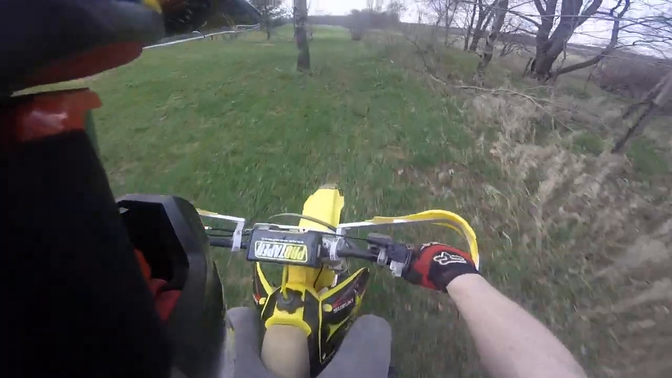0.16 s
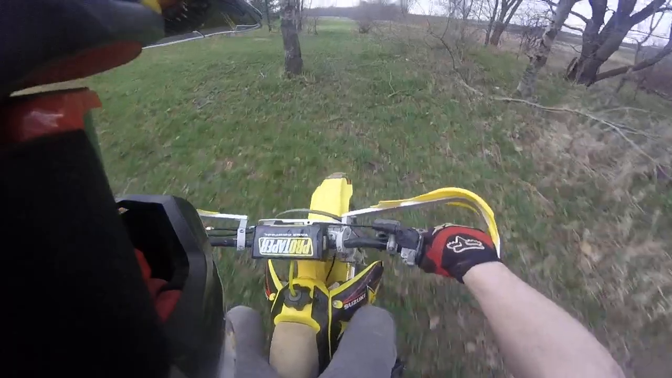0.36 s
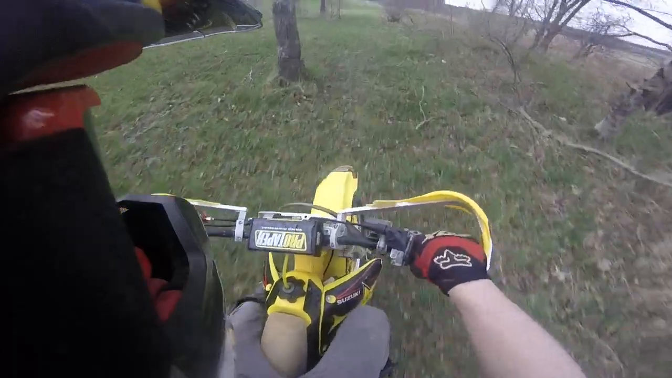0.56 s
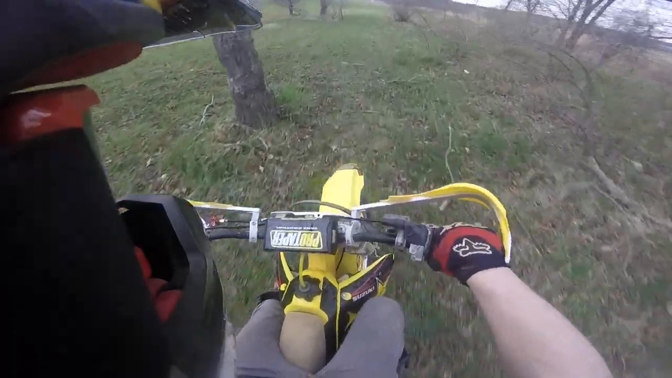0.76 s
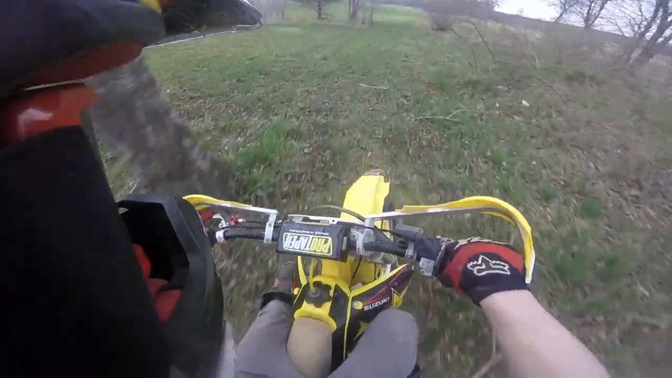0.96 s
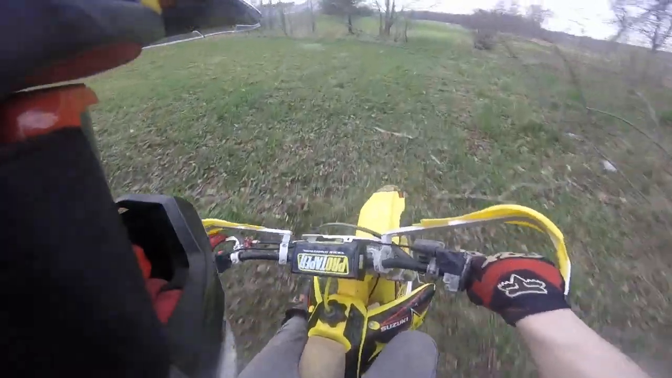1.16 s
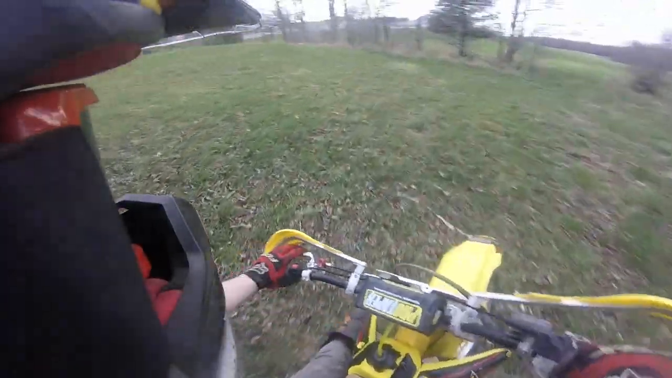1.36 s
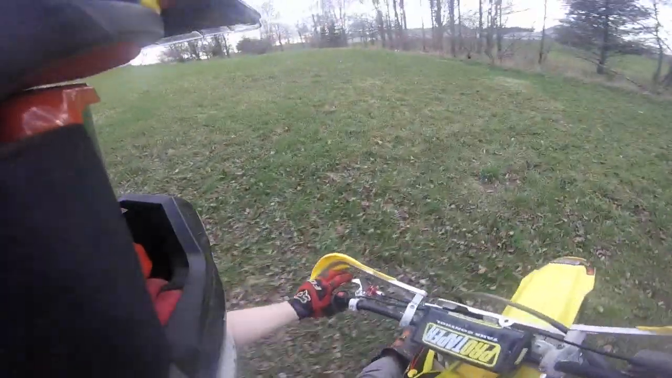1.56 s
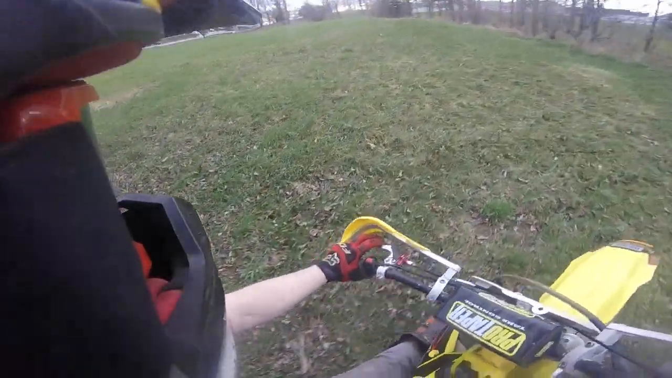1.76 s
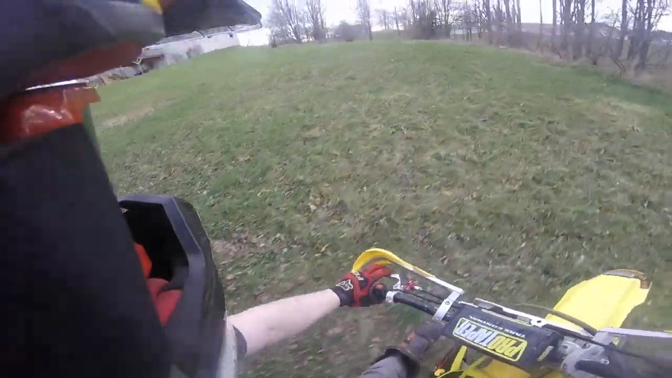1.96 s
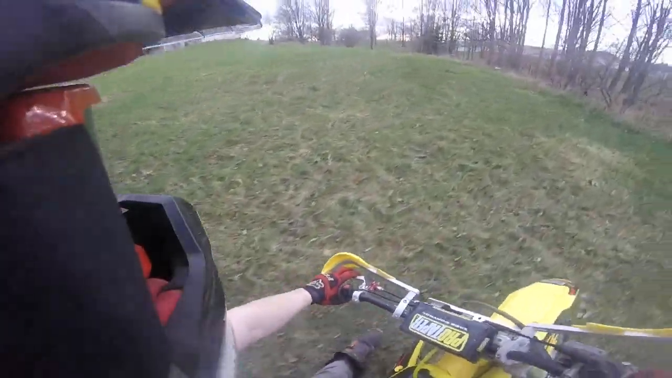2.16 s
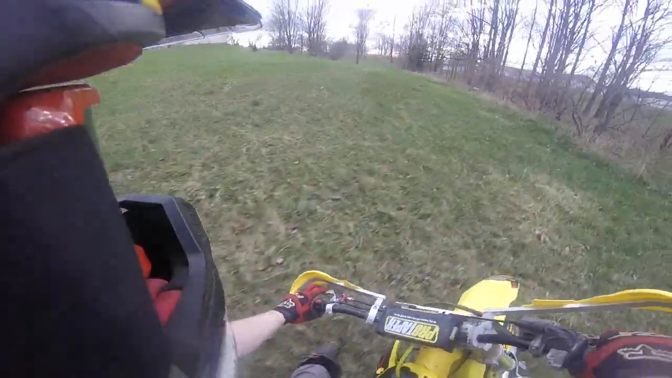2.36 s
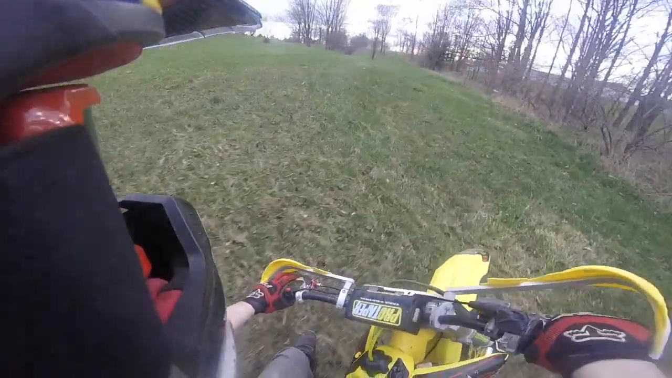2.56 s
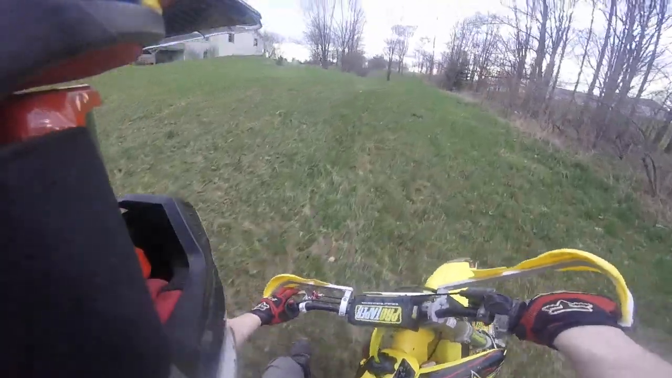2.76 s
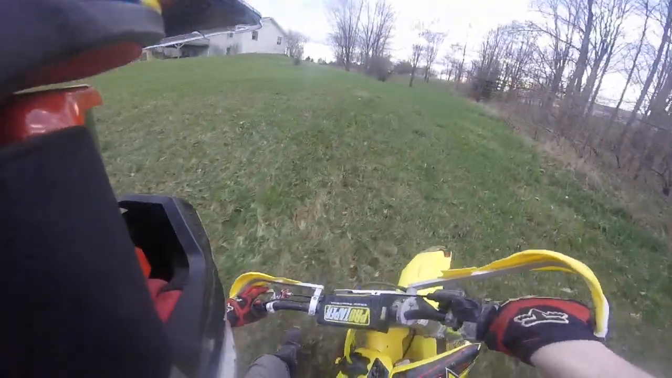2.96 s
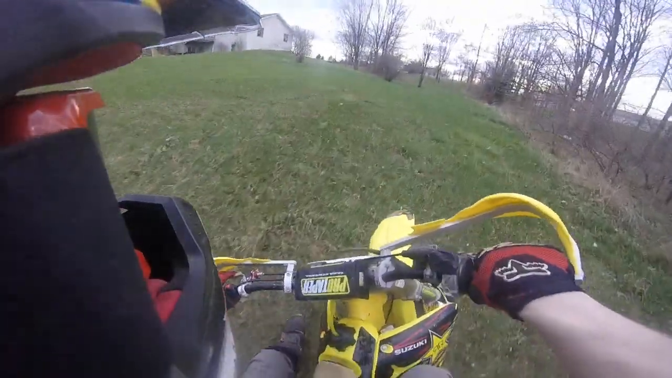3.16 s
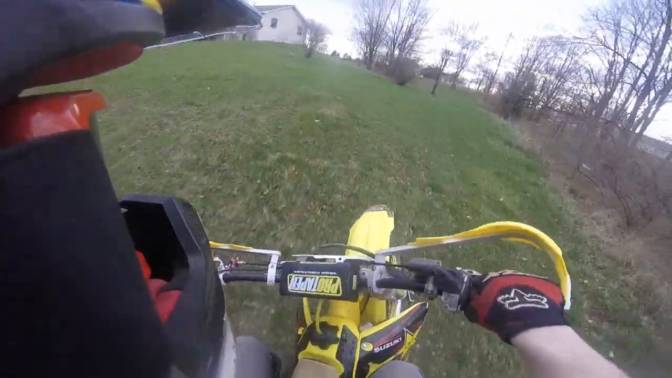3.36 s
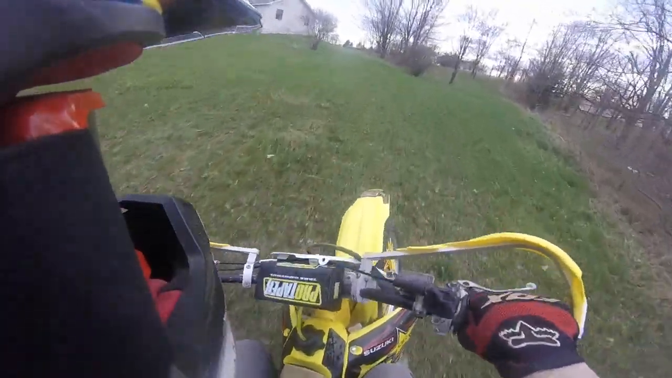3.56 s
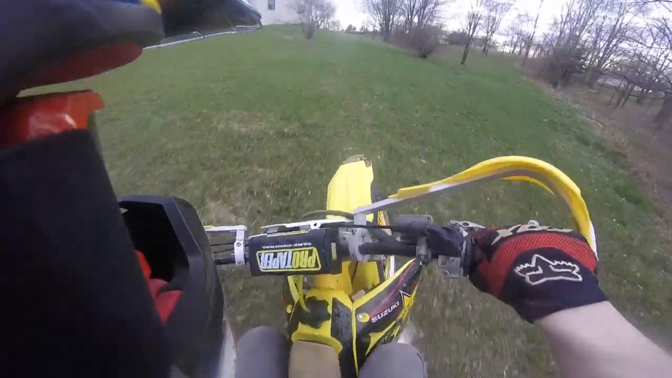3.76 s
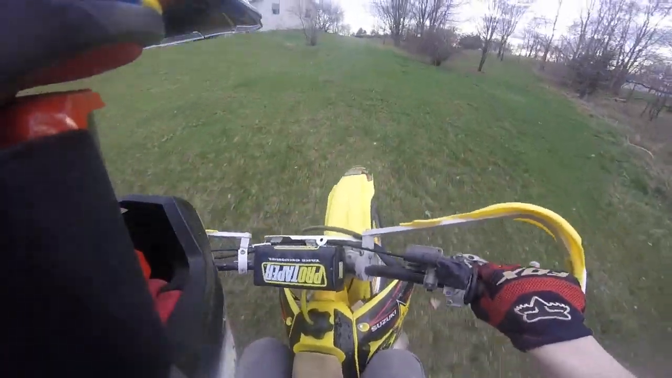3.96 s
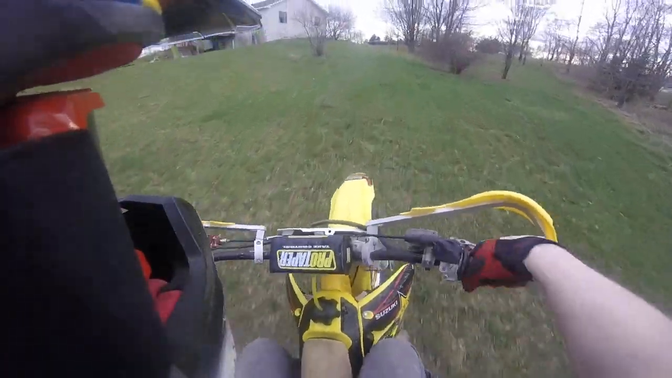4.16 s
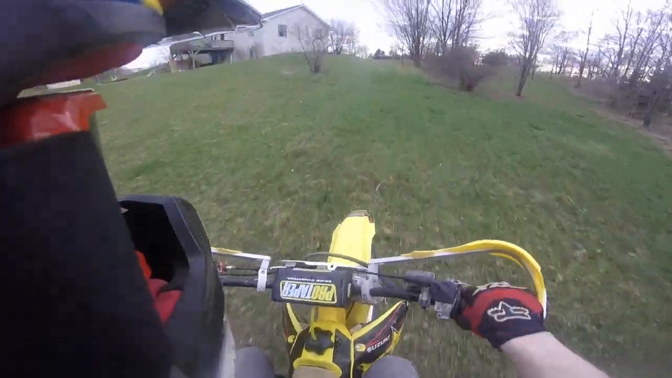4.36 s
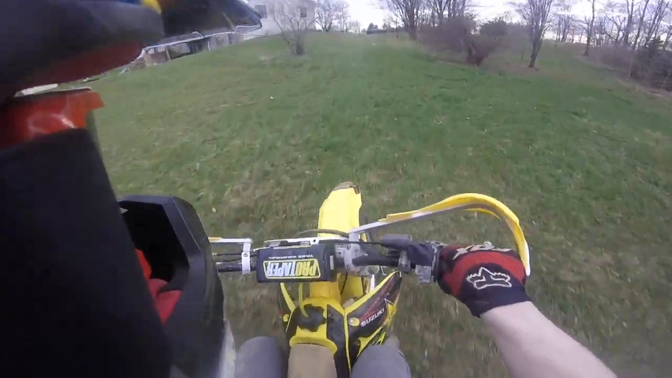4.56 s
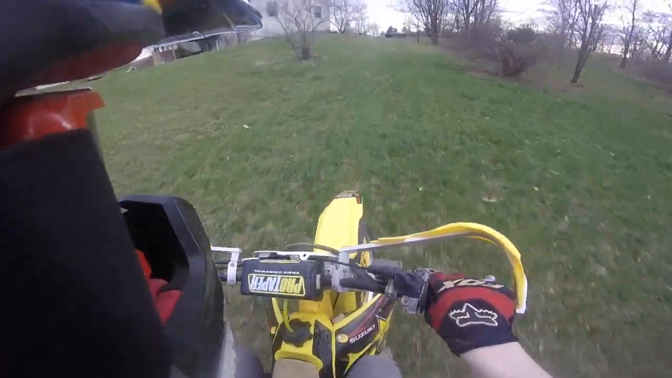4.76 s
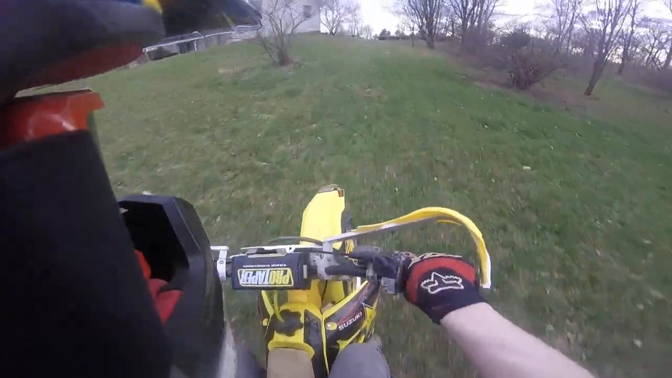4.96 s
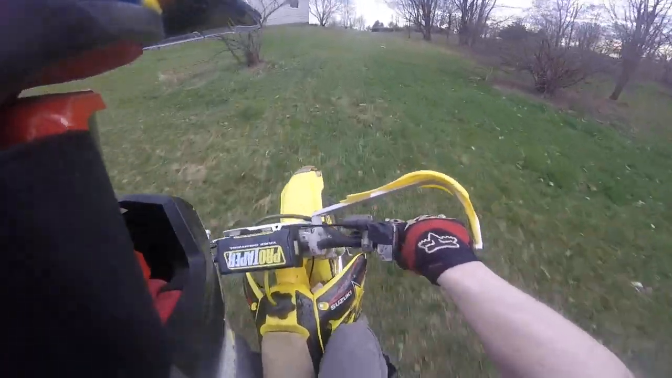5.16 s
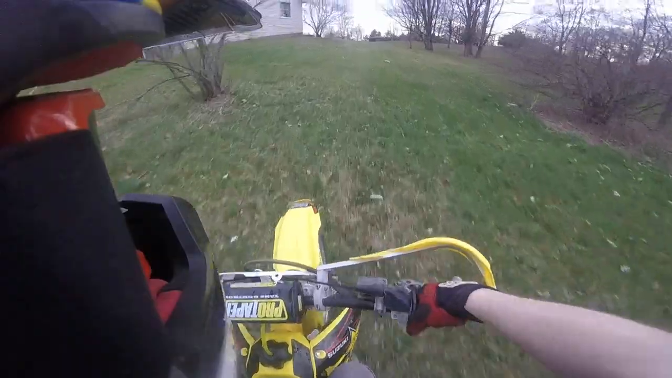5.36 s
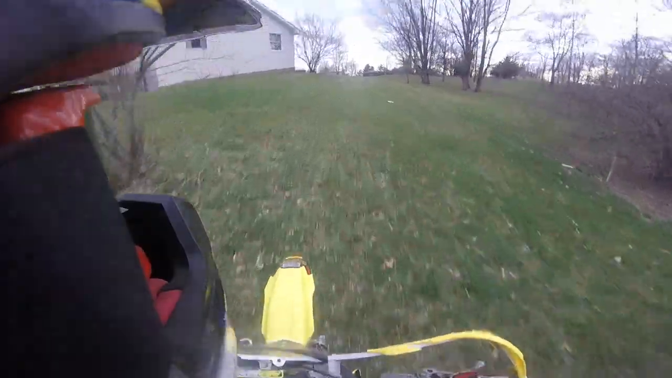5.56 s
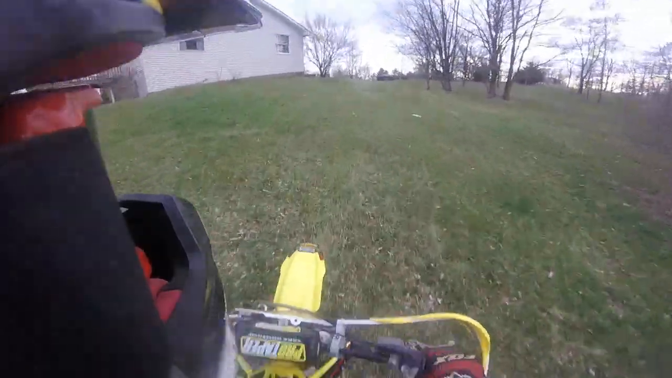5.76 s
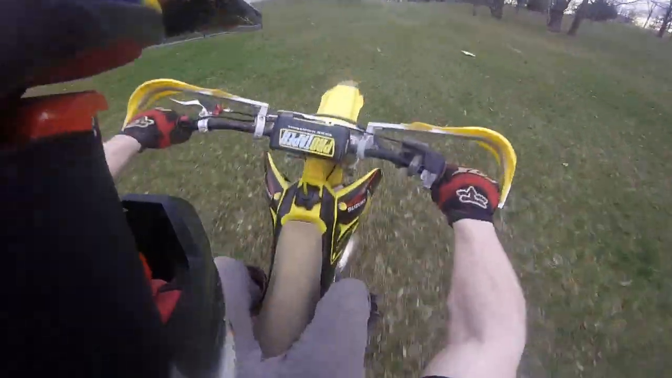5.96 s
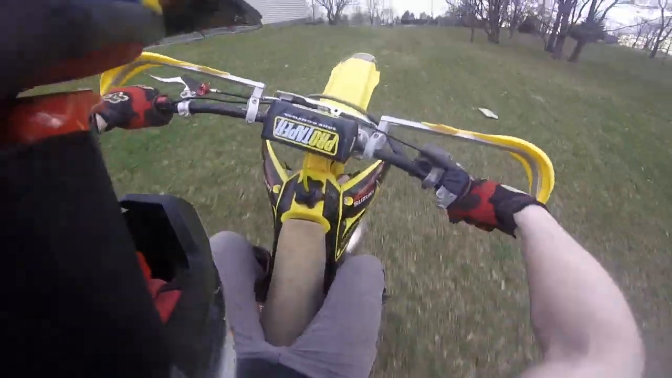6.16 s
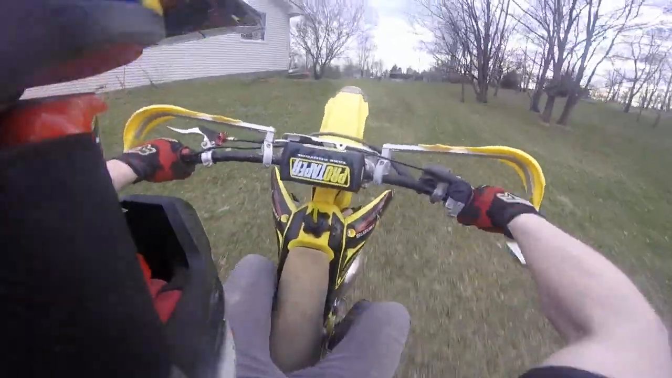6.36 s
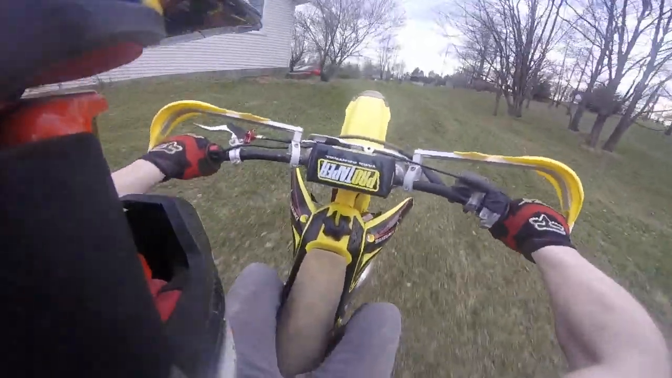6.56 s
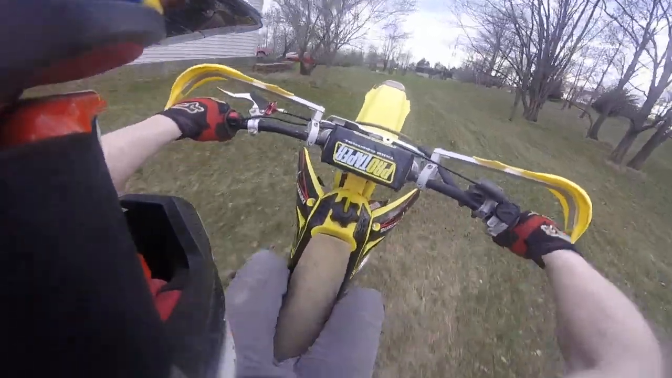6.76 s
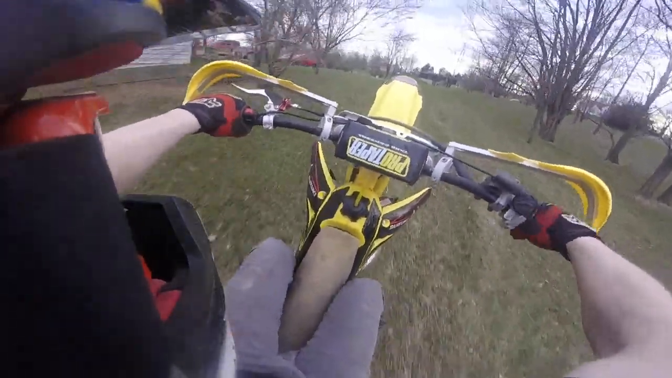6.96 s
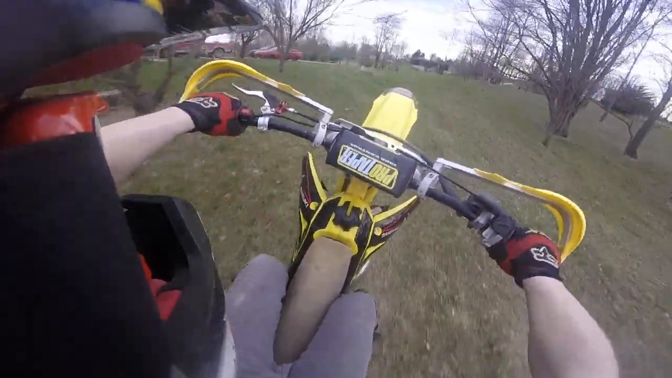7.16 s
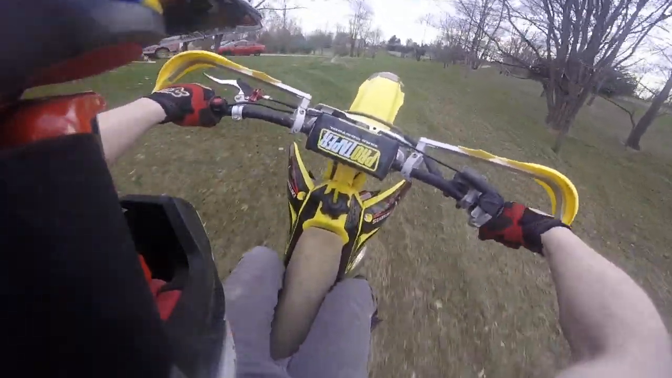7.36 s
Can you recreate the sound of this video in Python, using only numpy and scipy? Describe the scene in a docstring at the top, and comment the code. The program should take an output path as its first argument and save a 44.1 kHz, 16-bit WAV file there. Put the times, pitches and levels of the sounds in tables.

```python
"""A two-stroke dirt bike ridden over a field, heard at the rider's helmet.
A pull on the throttle ends and the bike coasts down with stray pops; it picks up, pulls through the revs
twice and is then blipped three times. Each firing excites the silencer, airbox and steel expansion chamber
as resonators and adds a bright rasp; gears whine at tooth-mesh rate.
Shaped noise makes the wind buffeting and the rush of chain and tyres throughout."""
import sys
import numpy as np
from scipy import signal
from scipy.fft import rfft, irfft, next_fast_len
from scipy.io import wavfile
from scipy.ndimage import uniform_filter1d

SR = 44100
rng = np.random.default_rng(int(sys.argv[2]) if len(sys.argv) > 2 else 0)


def put_to_file(sound):
    """Save the sound as 16-bit audio at rate SR, in the file named by the first command-line argument."""
    columns = np.atleast_2d(sound).T  # one column per channel
    safe = np.clip(columns, -1, 1)
    whole_steps = np.round(safe * 32767)
    wavfile.write(sys.argv[1], SR, whole_steps.astype(np.int16))


N = 326781
TIME = np.arange(N) / SR
PADDED = next_fast_len(N + SR // 2, real=True)
FREQ = np.maximum(np.fft.rfftfreq(PADDED, 1 / SR), 1)

# crank speed while the bike first coasts down, one firing a turn: time_s, crank_hz
COAST_REVS = [(0, 114.7), (.17, 117.3), (.36, 110.4), (.46, 113.2), (.72, 100.1), (1.2, 85.4), (1.7, 73.66),
              (1.88, 73.3)]
# crank speed from the pick-up on; it jumps when the rear wheel slips: time_s, crank_hz
REVS = [(1.96, 80.3), (2.14, 79.55), (2.22, 87.5), (2.28, 88.8), (2.58, 93.6), (2.67, 100.8), (2.81, 95.5),
        (2.98, 103.3), (3.1, 118.2), (3.29, 111.3), (3.48, 114.1), (3.6, 126.2), (3.64, 122.7),
        (3.8, 141.8), (3.87, 134.1), (3.99, 154.9), (4.04, 155.1), (4.21, 184.2), (4.28, 154.5),
        (4.34, 148.0), (4.45, 142.5), (4.48, 135.8), (4.54, 116.7), (4.66, 121.5), (4.71, 117.2),
        (4.84, 137.8), (4.99, 133.2), (5.06, 163.4), (5.07, 162.3), (5.1, 139.8), (5.12, 135.7),
        (5.16, 143), (5.22, 136.6), (5.33, 142.9), (5.36, 140.0), (5.42, 121.9), (5.63, 110.4),
        (5.81, 115.1), (5.89, 152.7), (5.97, 147.6), (6.03, 157.1), (6.1, 142.9), (6.15, 150), (6.25, 154),
        (6.41, 133.1), (6.51, 125.2), (6.56, 136.5), (6.6, 128), (6.85, 151.8), (6.91, 152.7),
        (6.98, 139.9), (7.07, 136.2), (7.1, 127.6), (7.12, 129.2), (7.24, 151), (7.3, 143.4), (7.35, 152.5),
        (7.41, 149.6)]
# the crank hunts a little around its speed: spread as a share, rate
HUNT, HUNT_RATE_HZ = 0.004025, 22

# pulls on the throttle, with levels when wide open (ring and rasp at the cruising crank speed):
# opens_s, shuts_s, attack_s, exhaust_note_db, chamber_ring_db, rasp_db
PULLS = [(-.3, 0.337, .02, -26.5, -22.5, -22.5), (1.676, 4.215, 0.19, -17, -16, -20),
         (4.432, 5.335, .015, -15, -17.5, -19.5), (5.816, 6.267, 0.057, -15.5, -17.5, -20),
         (6.5, 6.911, .02, -15.5, -19.5, -20), (7.106, 7.428, 0.0202, -17.5, -19.5, -19)]
# how far the grip is turned during the pulls: time_s, opening (0-1)
GRIP = [(.3, 0.15), (1.72, 0), (1.95, .16), (2.62, 0.38), (3.15, 0.33), (3.46, 0.56), (3.65, 0.57),
        (3.81, 1), (4.42, 0.94), (4.54, 0.56), (4.76, 0.61), (4.82, 0.9)]
# the note answers at once, surges on the first rich charges and fades as the grip rolls shut
NOTE_CLOSE_S, NOTE_CLOSED_SHARE, NOTE_RELEASE_S, SURGE_DB, SURGE_S = 0.095, 0.46, .02, 2, 0.16
# ring and rasp build once the pipe is hot and stop with the fire
HEAT_LAG_S, HEAT_RISE_S, HEAT_RELEASE_S = 0.021, 0.028, 0.013
# the hot pipe mutters on after a pull
MUTTER_DB, MUTTER_S = -24, 0.6
# coasting levels at the cruising crank speed
CRUISE_HZ = 140
COAST_NOTE_DB, COAST_RING_DB, COAST_RASP_DB = -50, -30.5, -30.5
# growth with crank speed in dB per octave, coasting and then under power
COAST_NOTE_SLOPE_DB, COAST_RING_SLOPE_DB, COAST_RASP_SLOPE_DB = 9, 15, 13
RING_SLOPE_DB, RASP_SLOPE_DB = 10.5, 8
# loss from a wide open to a shut grip
NOTE_RANGE_DB, RING_RANGE_DB, RASP_RANGE_DB = 14.5, 8.5, 9
# brief dips (positive) or flares (negative) of the chamber ring: middle_s, half_length_s, loss_db
RING_DIPS = [(2.1, .12, -1.5), (2.6, 0.3, 6), (5.165, .025, -4.5), (4.09, .022, 11), (4.215, 0.027, 6),
             (5.9, .04, 6), (6.055, 0.03, 11)]
# brief flares or sinks of the rasp: middle_s, half_length_s, change_db
RASP_FLARES = [(.55, 0.19, -4), (4.01, .04, 3), (4.5, 0.031, 1.5), (5.22, .13, 3), (5.865, 0.031, -5),
               (5.05, 0.025, 0), (6.14, .12, 3), (6.56, .03, 4.5), (6.89, 0.034, 3)]
# stumbles at light throttle: middle_s, half_length_s, extra_firing_spread_db
STUMBLES = [(1.8, 0.099, 4.5), (2.55, 0.047, 5.5)]
COAST_SPREAD_DB, POWER_SPREAD_DB = 1.7, .6

# silencer response at light and at full throttle: frequency_hz, relative_level_db
LIGHT_PIPE = [(60, -46), (100, -29.5), (160, 9.5), (205, 14.5), (320, 21.5), (400, -3.5), (440, -9),
              (495, 13.5), (600, -3), (690, 2), (940, -32), (1150, -25), (1400, -26), (2500, -54)]
FULL_PIPE = [(60, -16), (125, -6.5), (175, -2.5), (280, 12.5), (380, -1.5), (450, 4), (520, -5.5),
             (620, -2), (750, -16), (1130, -18.5), (2500, -41)]
# airbox response: frequency_hz, relative_level_db
AIRBOX = [(400, -20), (620, -7), (690, 8.5), (750, -19.5), (800, 6), (900, 4), (970, -3), (1060, 7.5),
          (1150, 9), (1260, 0), (1700, -32)]
# airbox honk relative to the exhaust note, fading below a crank speed
HONK_DB, HONK_FROM_HZ, HONK_FADE_DB_PER_HZ = -15, 100, 2
# swells of the honk: middle_s, half_length_s, rise_db
HONKS = [(3.25, 0.44, 8), (5.1, 0.3, 2.5), (6.08, 0.094, 9), (6.7, 0.097, 10.5), (7.29, 0.051, 10.5)]
# unburnt charge pumped through the pipe: frequency_hz, relative_level_db
PUMPING = [(50, -40.5), (90, 1), (120, 8), (145, 5), (190, 3.5), (240, -3), (340, -10), (430, 6),
           (600, -19), (680, 1.5), (850, -20.5), (1200, 4), (2000, -38)]
# modes of the expansion chamber shell: frequency_hz, width_hz, relative_level_db
CHAMBER = [(1102.6, 19.6, 1.5), (1405, 94, 8.5), (1538, 69, 8.5), (1604, 45, 11), (1700, 44, 8),
           (1768, 50, 4)]
# narrow rings of the engine's metal: frequency_hz, width_hz, level_above_rasp_db
FINS = [(2527, 27, 4), (2963, 57, 6), (3237, 42, 5), (3596, 24, 5.5), (3724, 21, 4), (3863, 88, 6),
        (4670, 12, 10), (4805, 52, 6), (5480, 114, 10), (5826, 33, 11), (6060, 50, 7), (6230, 39, 7.5),
        (7680, 74, 4.5), (8220, 86, 9), (8880, 20, 10), (9800, 80, 2.5)]
# rasp spectra, each: frequency_hz, relative_level_db
# exhaust bark under power
BARK = [(1500, -21), (2000, -13), (2300, 0), (2550, 1.5), (2720, -3.5), (3000, -3.5), (3600, 3),
        (3950, -6.5), (4250, -9), (4750, -13.5), (5150, -41), (7000, -31)]
# piston clatter
CLATTER = [(1500, -13.5), (2000, -7.5), (2500, -5.5), (3000, 0.5), (3300, 0), (3700, 1), (3950, -2),
           (4250, -6.5), (4550, -25), (4780, -14.5), (5200, -18), (7000, -50.5)]
# sizzle, mostly above both
SIZZLE = [(3500, -37), (5200, -15.5), (5750, -3), (6200, 0.5), (6550, 4), (6850, -5), (7450, -1),
          (7950, -6), (9300, -6), (10300, -16), (10800, -21), (11200, -36), (15000, -49)]
# the brightest hiss, on top
EDGE = [(6000, -35), (9000, 13.5), (11000, 5.5), (13000, -3), (15000, -8)]
# primary gears sing under drive at low revs, before their case colours them: time_s, drive_level_db
GEARS = [(0, -44), (1.6, -46), (1.8, -51.5), (2.1, -34), (2.25, -43.5), (2.6, -43), (2.95, -35),
         (3.15, -34), (3.35, -42), (7.41, -44)]
TEETH = 19
# stray firings with the throttle shut: time_s, strength_db
POPS = [(.772, -24.5), (.794, -20.5), (.837, -23), (0.868, -24), (1.13, -30), (1.189, -25.5),
        (1.262, -27.5), (1.341, -32), (1.381, -28), (1.431, -29), (1.499, -27), (1.539, -37), (1.569, -31),
        (1.599, -26.5), (1.658, -23.5), (1.704, -24), (1.732, -23), (1.77, -21), (1.811, -18), (1.842, -19),
        (1.867, -22)]
# response of the cool pipe to a lone firing: frequency_hz, relative_level_db
THUMP = [(80, -23), (170, -18), (235, 1), (275, 7.5), (330, -9.5), (420, -18), (560, -9.5), (900, -48),
         (1150, -19), (2000, -28), (3200, -16.5), (6000, -45)]

# wind on the helmet between gusts: time_s, level_db
WIND = [(0, -37.5), (2.6, -38.5), (3.5, -43), (4.8, -39), (5.9, -34), (7.41, -30.5)]
# gusts: middle_s, half_length_s, rise_db
GUSTS = [(4.55, .045, 9), (5.135, .045, 17), (6.06, 0.075, 13.5), (6.25, .035, 4)]
# spectrum of the buffeting: frequency_hz, relative_level_db
BUFFET = [(10, -3), (22, 0), (40, 2), (50, -7.5), (65, -17), (100, -17.5), (200, -26), (600, -65)]
# spectrum of chain and tyres on grass: frequency_hz, relative_level_db
ROLLING = [(30, -9), (100, -11.5), (270, -3.5), (500, -5), (900, -10.5), (2000, -10.5), (5000, -21.5),
           (15000, -58)]
CUTOFF_HZ = 15300


def engine():
    """Periodic excitation: each crank turn drives pipe, airbox, chamber and rasp."""
    crank_hz = in_time([*COAST_REVS, *REVS])[0] * (1 + HUNT * waver(HUNT_RATE_HZ))
    note_db, ring_db, rasp_db = load(crank_hz)
    # effective throttle, taken from the level of the note
    throttle = np.clip((note_db + 28.0) / 8, 0, 1)
    spread_db = np.interp(note_db, [-36, -29], [COAST_SPREAD_DB, POWER_SPREAD_DB]) + swells(STUMBLES)
    turns = np.cumsum(crank_hz) / SR
    fired = np.interp(np.arange(1, int(turns[-1])), turns, TIME)
    # weak firings stray further than strong ones
    chance = np.clip(rng.standard_normal(len(fired)), -2, 1)
    strength = from_db(np.interp(fired, TIME, spread_db) * chance)
    gas = exhaust(fired, strength, throttle) + intake(fired, strength, crank_hz)
    note = from_db(note_db) * gas
    # the metal is shaken even by a weak firing
    shake = strength ** .35
    shell = chamber_shell(low_hz=974, high_hz=2180)
    ring = from_db(ring_db) * chamber_ring(fired, shake, note_db, shell)
    evenness = throttle * np.clip(1.3 - .55 * spread_db, 0, 1)
    metal = rasp(fired, shake, evenness, rasp_db)
    return note + pumping(fired, crank_hz) + ring + metal + gears(turns) + pops(shell)


def load(crank_hz):
    """Source strength: dB levels of note, ring and rasp follow crank speed and throttle."""
    octaves = np.log2(crank_hz / CRUISE_HZ)
    opening = np.clip(in_time(GRIP)[0], 0, 1)
    note = from_db(COAST_NOTE_DB + COAST_NOTE_SLOPE_DB * octaves)
    ring = from_db(COAST_RING_DB + COAST_RING_SLOPE_DB * octaves)
    rasp = from_db(COAST_RASP_DB + COAST_RASP_SLOPE_DB * octaves)
    note_drive = from_db(-NOTE_RANGE_DB * (1 - opening))
    ring_drive = from_db(RING_SLOPE_DB * octaves - RING_RANGE_DB * (1 - opening))
    rasp_drive = from_db(RASP_SLOPE_DB * octaves - RASP_RANGE_DB * (1 - opening ** 2))
    for opens, shuts, attack_s, note_db, ring_db, rasp_db in PULLS:
        rolling_shut = np.interp(TIME, [shuts - NOTE_CLOSE_S, shuts], [1, NOTE_CLOSED_SHARE])
        surge = from_db(SURGE_DB * opening * gate(opens, attack_s, opens, SURGE_S))
        burning = gate(opens, attack_s, shuts, NOTE_RELEASE_S) * rolling_shut * surge
        mutter = from_db(MUTTER_DB) * gate(shuts, NOTE_RELEASE_S, shuts, MUTTER_S)
        hot = gate(opens + HEAT_LAG_S, HEAT_RISE_S, shuts, HEAT_RELEASE_S)
        # crossfade from the coasting level to the driven one
        note = note + (burning + mutter) * (from_db(note_db) * note_drive - note)
        ring = ring + hot * (from_db(ring_db) * ring_drive - ring)
        rasp = rasp + hot * (from_db(rasp_db) * rasp_drive - rasp)
    ring_level_db = 20 * np.log10(ring) - swells(RING_DIPS)
    rasp_level_db = 20 * np.log10(rasp) + swells(RASP_FLARES)
    return 20 * np.log10(note), ring_level_db, rasp_level_db


def exhaust(fired, strength, throttle):
    """Pipe resonance: hotter gas shifts the silencer's resonances as the throttle opens."""
    puffs = blows(fired, strength, scatter_db=.2, jitter_s=.000012, noise_db=-26, decay_s=.004)
    light = through(puffs, body(LIGHT_PIPE))
    full = through(puffs, body(FULL_PIPE))
    return steady((1 - throttle) * light + throttle * full)


def intake(fired, strength, crank_hz):
    """Cavity resonance: each gulp of air rings the airbox, a little differently every turn."""
    gulps = blows(fired + 0.001, strength, scatter_db=0.7, jitter_s=.00002, noise_db=-13, decay_s=0.0028)
    fade_db = HONK_FADE_DB_PER_HZ * np.maximum(HONK_FROM_HZ - crank_hz, 0)
    honk_db = HONK_DB + swells(HONKS) - fade_db
    return from_db(honk_db) * steady(through(gulps, body(AIRBOX)))


def pumping(fired, crank_hz):
    """Volume displacement: the piston pumps even without fire, harder at speed."""
    strokes = clicks(fired + 0.00035, np.ones(len(fired)))
    return from_db(-41) * (crank_hz / 120) ** 1.6 * steady(through(strokes, body(PUMPING)))


def chamber_shell(low_hz, high_hz):
    """Modal superposition: the shell's response sums its modes, with steep skirts."""
    modes = 0
    for k, (hz, width, db) in enumerate(CHAMBER):
        modes = modes + (-1) ** k * resonance(hz, width) * from_db(db)
    return modes / (1 + 1j * (FREQ - low_hz * high_hz / FREQ) / (high_hz - low_hz))


def chamber_ring(fired, shake, note_db, shell):
    """Impact excitation: firings ring the shell; under power the shocks stand out of the turbulence."""
    noise_db = np.interp(note_db, [-36, -20], [-1, -9])
    knocks = blows(fired, shake, scatter_db=1.1, jitter_s=.000014, noise_db=noise_db, decay_s=.007)
    return steady(wandering_echo(through(knocks, shell), echo_db=-7, drift_s=0.00027))


def rasp(fired, strength, evenness, rasp_db):
    """Shock steepening: clatter yields to a clean bark under power, and a louder rasp is brighter."""
    metal = 1 + sum((from_db(db) - 1) * resonance(hz, width) for hz, width, db in FINS)
    share = .2 + .58 * evenness
    # the rasp comes later in the turn than the exhaust pulse
    shocks = blows(fired + .003, strength, scatter_db=1.2, jitter_s=.000006, noise_db=-15, decay_s=.004)
    slaps = clicks(fired + 0.0011, strength * from_db(2.2 * rng.standard_normal(len(fired))))
    bark = steady(through(shocks, body(BARK) * metal * smear(decay_s=0.0049)))
    clatter = steady(through(gush(slaps, decay_s=0.028), body(CLATTER) * metal))
    spray = np.sqrt(.7 * share) * shocks + np.sqrt(1 - .7 * share) * gush(slaps, decay_s=.014)
    sizzle = steady(through(spray, body(SIZZLE) * metal * smear(decay_s=0.011)))
    sizzle = from_db(-8.5 + 1.1 * waver(28)) * sizzle
    jets = gush(clicks(fired + 0.002, np.ones(len(fired))), decay_s=0.012)
    edge_db = -19 + 0.4 * (rasp_db + 25.5)
    edge = from_db(edge_db) * steady(through(jets, body(EDGE)))
    mix = np.sqrt(share) * bark + np.sqrt(1 - share) * clatter + sizzle + edge
    return from_db(rasp_db + .5 * waver(21)) * mix


def smear(decay_s, size=1024):
    """Diffuse reverberation: dense short echoes in the metal spread a shock and keep its colour."""
    response = rfft(rng.standard_normal(size) * np.exp(-TIME[:size] / decay_s), PADDED)
    return response / np.sqrt(uniform_filter1d(np.abs(response) ** 2, size=240))


def gears(turns):
    """Tooth mesh: a whine throbbing twice a turn and a rattling octave, coloured by the case."""
    mesh = 2 * np.pi * TEETH * turns
    whine = np.sin(mesh) * (1 + .8 * np.cos(4 * np.pi * turns) + .6 * waver(40))
    rattle = waver(150) * np.sin(2 * mesh)
    # frequency_hz, relative_level_db
    case = body([(1300, 0.5), (1650, 2.5), (1950, -13.0), (2500, -2),
                 (3000, 6.0), (3900, 1.0), (4500, -17), (6000, -10)])
    (gears_db,) = in_time(GEARS)
    return from_db(gears_db) * through(from_db(5.0) * whine + from_db(-1.5) * rattle, case)


def pops(shell):
    """Impulse response: lone firings thump in the pipe and ping the chamber."""
    s, db = np.transpose(POPS)
    bangs = clicks(s, from_db(db))
    thump, ping = [through(bangs, response / np.abs(irfft(response)).max())
                   for response in (body(THUMP), shell)]
    return from_db(3.5) * thump + from_db(-4.5) * ping


def wandering_echo(x, echo_db, drift_s):
    """Comb interference: a reflection's delay drifts, so harmonics swell and fade."""
    delay_s = .0052 + drift_s * waver(5.74)
    return x + from_db(echo_db) * np.interp(TIME - delay_s, TIME, x)


def riding():
    """Turbulent noise: wind buffets the helmet over the soft rush of chain and tyres."""
    wind_db = in_time(WIND)[0] + swells(GUSTS)
    wind = steady(through(rng.standard_normal(N), body(BUFFET)), size=8000)
    rolling = through(rng.standard_normal(N), body(ROLLING))
    rolling_db = -43.0 + 0.68 * TIME
    return from_db(wind_db) * wind + from_db(rolling_db) * rolling / rolling.std()


def blows(fired, strength, scatter_db, jitter_s, noise_db, decay_s):
    """Shock and wake: a slightly irregular impulse at each firing, followed by turbulence."""
    chance = rng.standard_normal((len(fired), 2))
    sizes = strength * from_db(scatter_db * chance[:, 1])
    shocks = clicks(fired + jitter_s * chance[:, 0], sizes)
    return steady(shocks) + from_db(noise_db) * gush(shocks, decay_s)


def gush(pulses, decay_s):
    """Decaying turbulence: noise flares at each pulse and dies away, then is levelled to rms 1."""
    # the tiny offset keeps the flare above zero
    flare = signal.lfilter([1], [1, -np.exp(-1 / (decay_s * SR))], pulses + 1e-18)
    return steady(flare * rng.standard_normal(N))


def clicks(seconds, sizes):
    """Ideal impulses, each shared between the two nearest samples."""
    at = np.clip(seconds * SR, 0, N - 2)
    whole = at.astype(int)
    early = np.bincount(whole, sizes * (1 - at + whole), N)
    late = np.bincount(whole + 1, sizes * (at - whole), N)
    return early + late


def resonance(hz, width):
    """Damped oscillator: band-pass response with unit peak."""
    return 1 / (1 + 1j * hz / width * (FREQ / hz - hz / FREQ))


def body(points, size=32768):
    """Minimum phase: the causal response with the given spectrum, by folding its cepstrum."""
    hz, db = np.transpose(points)
    grid = np.maximum(np.fft.rfftfreq(size, 1 / SR), 1)
    cepstrum = irfft(np.log(from_db(np.interp(np.log(grid), np.log(hz), db))))
    cepstrum[1:size // 2] *= 2
    cepstrum[size // 2 + 1:] = 0
    return np.interp(FREQ, grid, np.exp(rfft(cepstrum)))


def through(x, response):
    """Linear filtering: multiply the spectrum of x by a response."""
    return irfft(rfft(x, PADDED) * response, PADDED)[:N]


def steady(x, size=2200):
    """Level normalisation: running rms brought to 1."""
    power = uniform_filter1d(uniform_filter1d(x * x, size), size // 2)
    return x / np.sqrt(np.maximum(power, 1e-6 * np.mean(x * x)))


def waver(rate_hz, size=32768):
    """Low-passed noise: smooth random drift with a spread of 1."""
    hz = np.fft.rfftfreq(size, TIME[-1] / size)
    slow = irfft(rfft(rng.standard_normal(size)) / (1 + (hz / rate_hz) ** 4))
    return np.interp(TIME, np.linspace(0, TIME[-1], size), slow / slow.std())


def swells(rows):
    """Superposition of bell curves from rows of middle_s, half_length_s, height."""
    s = TIME[::32]
    bells = sum(height * np.exp(-((s - middle) / half_s) ** 2) for middle, half_s, height in rows)
    return np.interp(TIME, s, bells)


def gate(start_s, attack_s, stop_s, release_s):
    """Envelope: straight attack, hold, exponential release."""
    attack = np.clip((TIME - start_s) / attack_s, 0, 1)
    return attack * np.exp(-np.clip((TIME - stop_s) / release_s, 0, 20))


def in_time(rows):
    """Linear interpolation: one curve over all samples for each column after the time."""
    s, *columns = np.transpose(rows)
    return [np.interp(TIME, s, c) for c in columns]


def from_db(db):
    """Decibel law: amplitude factor from a level."""
    return 10 ** (np.asarray(db) / 20)


def scene():
    """Superposition: the engine with a wandering echo plus the riding noise, alike in both channels."""
    bike = wandering_echo(engine(), echo_db=-9.0, drift_s=0.000327)
    return np.tile(bike + riding(), (2, 1))


def record(dry):
    """Saturation and band limit: peaks are rounded and the top is cut."""
    rounded = 1.399 * np.tanh(dry / 1.61)
    low_pass = signal.ellip(14, .1, 80, CUTOFF_HZ, fs=SR, output="sos")
    return signal.sosfilt(low_pass, rounded)


dry = scene()
out = record(dry)
put_to_file(out)
```